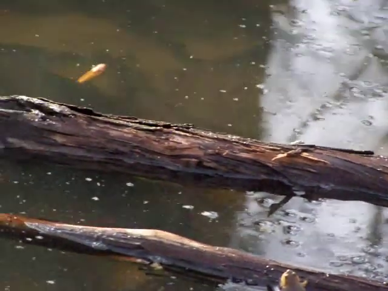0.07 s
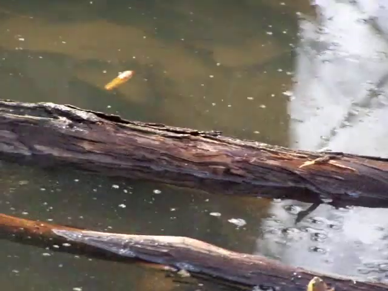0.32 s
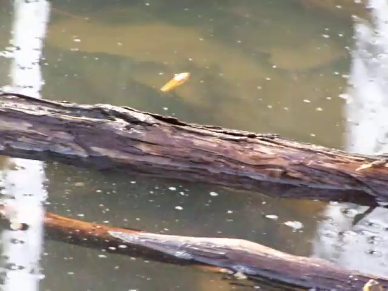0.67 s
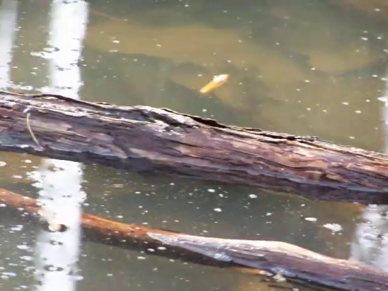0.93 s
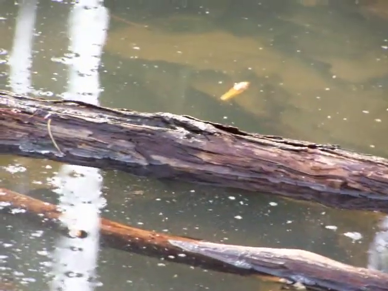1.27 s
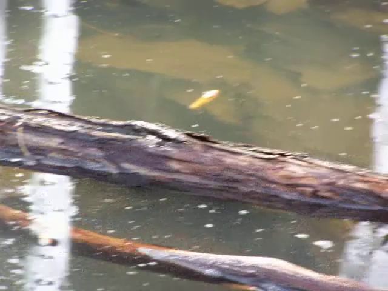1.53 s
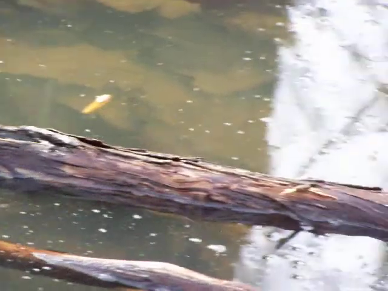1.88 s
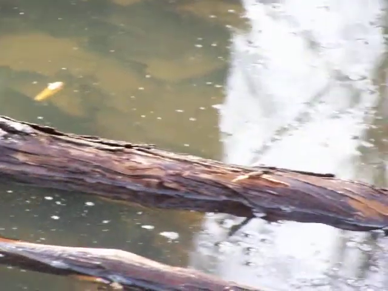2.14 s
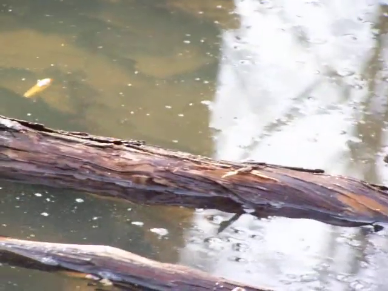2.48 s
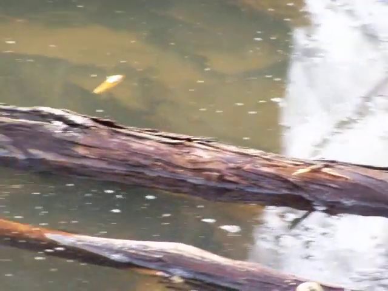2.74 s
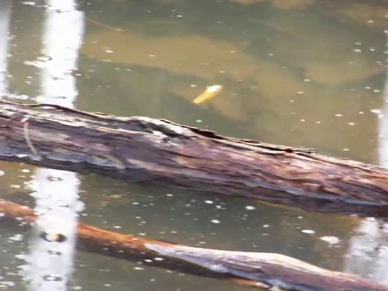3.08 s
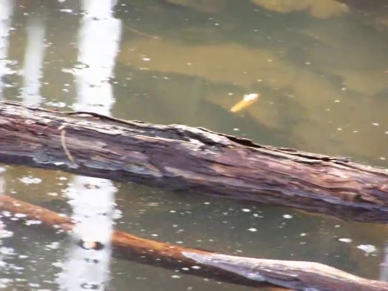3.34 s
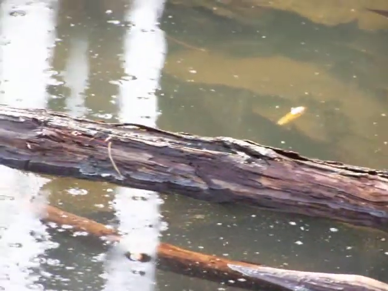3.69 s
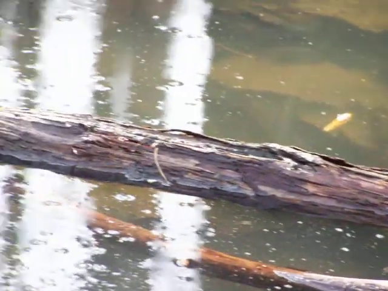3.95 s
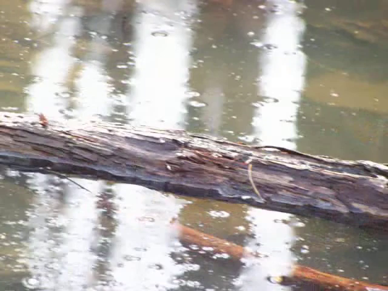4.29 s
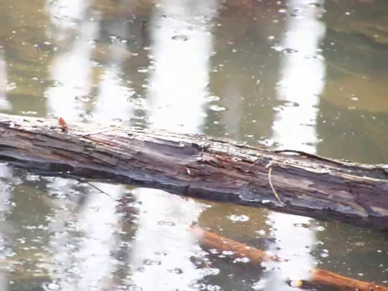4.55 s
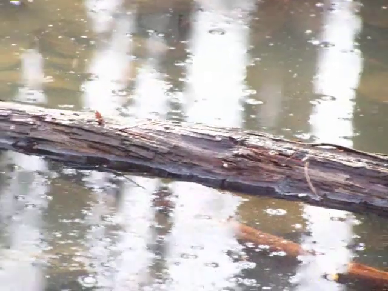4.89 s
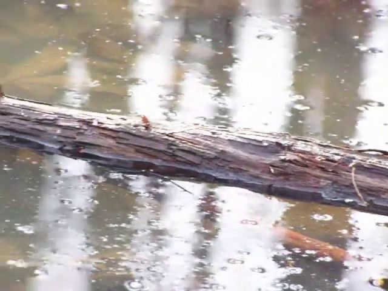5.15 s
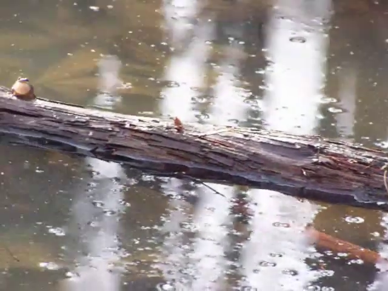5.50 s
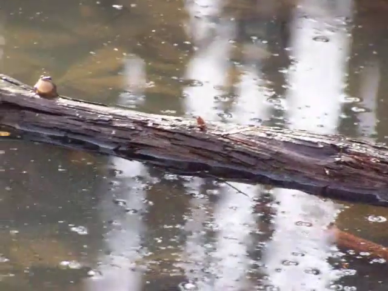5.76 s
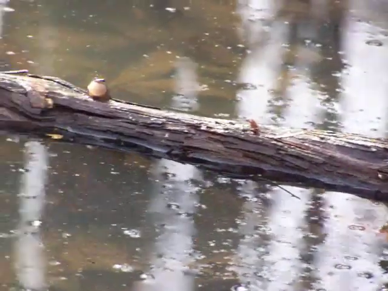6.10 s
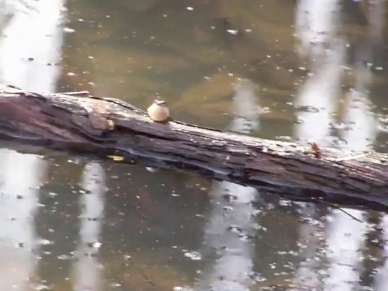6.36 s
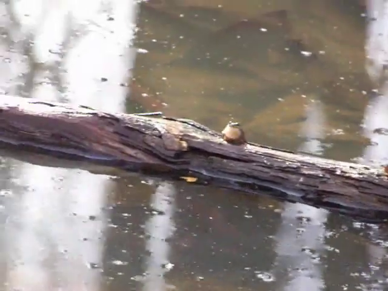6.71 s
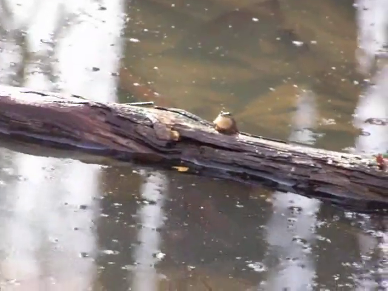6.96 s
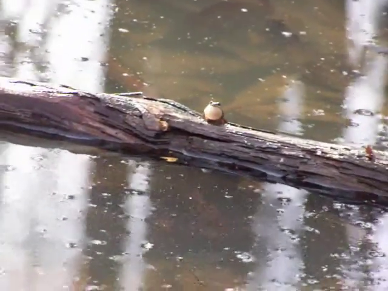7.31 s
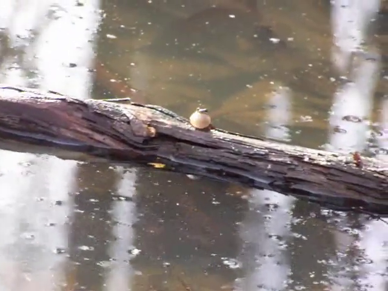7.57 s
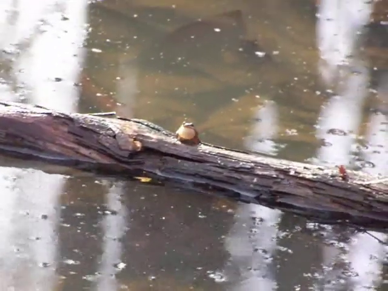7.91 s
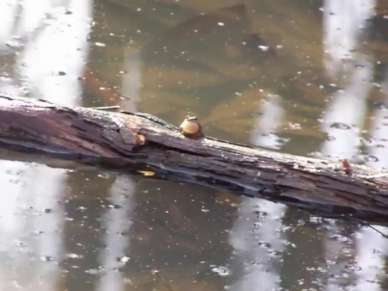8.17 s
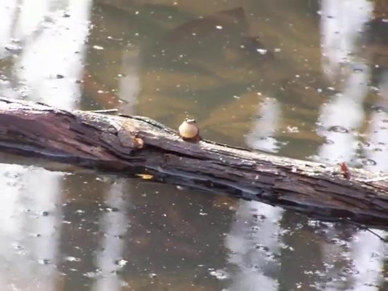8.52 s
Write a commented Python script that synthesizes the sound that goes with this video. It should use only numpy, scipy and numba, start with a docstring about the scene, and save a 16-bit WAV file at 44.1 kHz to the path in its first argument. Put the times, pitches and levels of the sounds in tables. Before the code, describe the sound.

A chorus of small frogs gives short, rising, clicky trills around a woodland pool, over a steady high din of distant frogs.

```python
"""From the start, small frogs trill round a woodland pool over a distant din and a faint rumble of air.
Each call is a comb-like run of dry clicks that slows, swells and climbs; trunks scatter the clicks.
Near 1 s the nearest frog joins, then calls about once a second; gain control ducks under it.
At 1.5 s comes one faint tick. Near calls and waves of far answers overlap to the end at 8.5 s."""
import sys
import numpy as np
from scipy import signal
from scipy.fft import rfft, irfft, next_fast_len
from scipy.io import wavfile
from scipy.ndimage import uniform_filter1d
from numba import njit

SR = 44100
rng = np.random.default_rng(int(sys.argv[2]) if len(sys.argv) > 2 else 0)


def int16_out(signal):
    """Quantize to a 16-bit WAV file."""
    q = np.round(np.clip(np.atleast_2d(signal).T, -1, 1) * 32767)
    wavfile.write(sys.argv[1], SR, q.astype(np.int16))


N = 376173

# voice: level/dB, first f/Hz, last f/Hz, swell/dB, overtones/dB, upper re lower overtone/dB, tail/dB
NEAR_VOICES = {"nearest": (3.5, 3679.5, 4077.5, 7, -17, -10, -24),
               "harsh": (-4, 3059.5, 3519.5, 3, -6.5, -11.5, -17.5),
               "steady": (1, 3128, 3289.5, 7, -13, -5, -22.5),
               "high": (-4.5, 3100, 3679.5, 9, -15.5, -12.5, -9.5),
               "middle": (-5.5, 2880.5, 3402.5, 4.5, -15.5, -8.5, -18),
               "low": (-2, 2922, 3143.5, 5.5, -17.5, -9.5, -17)}
# start t/s, end t/s, voice, last click gap/ms, effort/dB
NEAR_TRILLS = [(-.19, .206, "middle", 36, -2), (-.1, .294, "low", 32.5, -2), (.28, .775, "harsh", 35, 0),
               (.31, .772, "middle", 33, 1), (.84, 1.343, "middle", 34.5, -1),
               (.94, 1.252, "nearest", 29.8, 0), (1.0, 1.383, "high", 33, -3),
               (1.46, 1.895, "middle", 32.5, 1), (1.58, 2.1, "harsh", 38, -4),
               (1.98, 2.442, "steady", 28, -4), (2.16, 2.496, "nearest", 28.9, -1),
               (2.63, 3.083, "harsh", 36, -1), (2.64, 3.047, "high", 33, 0), (2.68, 3.12, "middle", 35, -1),
               (3.06, 3.575, "middle", 34.5, -3), (3.2, 3.574, "nearest", 29.8, .5),
               (3.6, 3.963, "steady", 28.5, 0), (3.76, 4.082, "high", 35, 0),
               (4.12, 4.53, "steady", 29, -2), (4.15, 4.561, "high", 30, -1),
               (4.15, 4.656, "harsh", 38.5, 0), (4.3, 4.816, "low", 40, -3),
               (4.64, 5.086, "middle", 32, -2), (4.75, 5.118, "nearest", 29.6, -1.5),
               (5.2, 5.596, "steady", 29, .5), (5.27, 5.69, "middle", 36, -3.5),
               (5.71, 6.197, "harsh", 39, 1), (5.77, 6.16, "low", 39, 1), (5.74, 6.17, "high", 30, -1.5),
               (6.17, 6.57, "nearest", 29.4, .5), (6.46, 6.853, "steady", 30, -1),
               (6.48, 6.842, "high", 34, -3), (6.93, 7.241, "middle", 36, 2),
               (6.92, 7.358, "low", 32.5, -.5), (7.35, 7.673, "low", 28.5, 0),
               (7.38, 7.729, "nearest", 32, 2), (7.63, 8.022, "harsh", 35.5, 1),
               (7.86, 8.3, "middle", 35, 0), (7.87, 8.292, "steady", 29.5, 0),
               (8.29, 8.659, "middle", 28, -1)]


def near_frogs():
    """Each voice has its own pitch climb, brightness and place among the trunks."""
    out = np.zeros(N)
    for voice, (db, first_hz, last_hz, swell_db, overtone_db, upper_db, tail_db) in NEAR_VOICES.items():
        track = np.zeros(N)
        for start_s, end_s, caller, last_gap_ms, effort_db in NEAR_TRILLS:
            if caller == voice:
                add_trill(track, start_s, end_s, last_gap_ms, first_hz, last_hz,
                          db + effort_db, swell_db, overtone_db, upper_db)
        out += trunks(track, tail_db)
    return out


def add_trill(track, start_s, end_s, last_gap_ms, first_hz, last_hz, db, swell_db, overtone_db, upper_db,
              first_gap_ms=18.1, slowing_clicks=8.0, sac_fill_s=.04, count=24):
    """As the frog squeezes harder, its clicks spread out, get louder and climb."""
    from_last = np.arange(count - 1)
    gaps_ms = first_gap_ms + (last_gap_ms - first_gap_ms) * np.exp(-(from_last / slowing_clicks) ** 2)
    times_s = end_s - np.r_[0, np.cumsum(gaps_ms)] / 1000
    remaining = np.clip((end_s - times_s) / (end_s - start_s), 0, 1)
    pitch_jitter, jitter_db = rng.standard_normal((count, 2)).T
    hz = (last_hz + (first_hz - last_hz) * remaining ** 1.85) * (1 + .004 * pitch_jitter)
    sac_fill = (times_s >= start_s) * (1 - .5 * np.exp(-abs(times_s - start_s) / sac_fill_s))
    gain = sac_fill * undb(db - swell_db * remaining ** 1.8 + jitter_db)
    reflection_db = -7.5 - max(db, -3)  # louder = closer = drier
    clicks = perch(larynx_clicks(hz, overtone_db, upper_db), reflection_db)
    for onset_s, click in zip(times_s, gain[:, None] * clicks):
        add(track, click, onset_s - .0014)


# click partials, sac favours the second: f/larynx pitch, base level/dB, base rise t/ms
SAC_PARTIALS = [(1, -23, 1.2), (2, 0, 1.65)]
# partials scaled by the snap: same columns
SNAP_PARTIALS = [(2.971, -1.2, 0.69), (3.921, -1.5, 0.66)]


def larynx_clicks(hz, overtone_db, upper_db, sag_ms=.93, rasp_db=-14, rasp_ms=.91):
    """The larynx snaps, the sac rings; a harder snap is brighter, shorter and sags more. One row each."""
    t_ms = np.arange(SR // 80) / SR * 1000
    jitter = rng.standard_normal((len(hz), 2))
    snap = undb(overtone_db + 1.5 * jitter[:, :1])
    stretch = np.exp(.08 * jitter[:, 1:] - .6 * snap)
    larynx_hz = hz[:, None] / 2 * (1 + .07 * snap * np.exp(-t_ms / sag_ms))
    phase = 2 * np.pi * np.cumsum(larynx_hz, axis=1) / SR
    out = snap * undb(rasp_db) * rng.standard_normal(phase.shape) * np.exp(-t_ms / rasp_ms)
    gains = (1, 1, snap, snap * undb(upper_db))
    for (multiple, db, rise_ms), gain in zip(SAC_PARTIALS + SNAP_PARTIALS, gains):
        age = t_ms / (rise_ms * stretch)
        envelope = (age * np.exp(1 - age)) ** 2
        offset_rad = rng.uniform(0, 2 * np.pi, (len(hz), 1))
        out += gain * undb(db) * envelope * np.sin(multiple * phase + offset_rad)
    return out


# throat and sac response: f/Hz, level/dB
THROAT_RESPONSE = [(600, 1), (1250, -11.5), (1750, 2), (2300, -0.5), (3000, -2.5), (4200, 1), (6500, -2),
                   (8000, -2)]


def throat(x):
    """Throats and sacs colour the calls."""
    return colour(x, THROAT_RESPONSE)


# waves of answers round the bank: t/s, level/dB
ANSWER_WAVES = [(-.2, -12.5), (0.17, -7), (.78, -6.5), (1.38, -14), (1.93, -9), (2.5, -5.5), (3.04, -4),
                (3.58, -12), (4.041, -8.5), (4.53, -7), (5.04, -9), (5.66, -7.5), (6.151, -8), (6.84, -6.5),
                (7.22, -7.5), (7.72, -11.5), (8.299, -11)]


def far_frogs(per_wave=4, max_delay_s=.14, length_s=.49, last_gap_ms=33, first_hz=2872, last_hz=3290):
    """One frog sets off its neighbours, each with its own size, pace and distance."""
    track = np.zeros(N)
    for wave_s, db in ANSWER_WAVES:
        for size, pace, distance in rng.standard_normal((per_wave, 3)):
            start_s = wave_s + rng.uniform(0, max_delay_s)
            pitch, stretch = 1 + .025 * size, 1 + .06 * pace
            add_trill(track, start_s, start_s + length_s * stretch, last_gap_ms * stretch,
                      first_hz * pitch, last_hz * pitch, db + 2 * distance,
                      swell_db=5.5, overtone_db=-13, upper_db=-9.5)
    return track


def perch(clicks, db, decay_s=.0028):
    """Quick reflections off water and logs round the frog."""
    t = np.arange(SR // 120) / SR
    scatter = rng.standard_normal(len(t)) * np.exp(-t / decay_s) * (t > .0006)
    response = (t == 0) + undb(db) * scatter / np.linalg.norm(scatter)
    return signal.fftconvolve(clicks, response[None], axes=1)


def trunks(x, tail_db, t60_s=.62):
    """Trunks scatter the sound into a thin tail."""
    t = np.arange(SR * 3 // 4) / SR
    tail = rng.standard_normal(len(t)) * undb(-60 * t / t60_s) * (t > .008)
    return x + undb(tail_db) * signal.fftconvolve(x, tail / np.linalg.norm(tail))[:N]


def tick(start_s=1.515, decay_s=.0015):
    """One faint dry tick close by."""
    track, t = np.zeros(N), np.arange(SR // 50) / SR
    add(track, undb(-23) * rng.standard_normal(len(t)) * np.exp(-t / decay_s), start_s)
    return track


# furthest frogs: f/Hz, relative density/dB
DIN_SPECTRUM = [(600, -46.5), (1200, -16.5), (1700, -26), (2300, -21), (3000, 11.5), (4000, -20),
                (5000, -35.5), (7000, -24), (11000, -71.5)]


def din():
    """The furthest frogs blur into steady noise near 3 kHz."""
    return noise(DIN_SPECTRUM, rms_db=-26)


# moving air: f/Hz, relative density/dB
AIR_SPECTRUM = [(15, -24.5), (25, -8), (96, -1), (199, -4.5), (260, -3.5), (387, -9.5), (514, -11),
                (854, -14.5), (1100, -21), (1430, -36), (2420, -120)]


def air():
    """Faint rumble of moving air."""
    return noise(AIR_SPECTRUM, rms_db=-49.5)


def undb(db):
    """Decibels to gain."""
    return 10 ** (np.asarray(db) / 20)


def add(track, sound, start_s):
    """Mix in a sound, dropping what falls outside the track."""
    i = int(start_s * SR)
    lo, hi = max(i, 0), min(i + len(sound), N)
    if hi > lo:
        track[lo:hi] += sound[lo - i:hi - i]


def colour(x, spectrum):
    """Filter by (f/Hz, level/dB) points."""
    hz, gain_db = np.transpose(spectrum)
    size = next_fast_len(N + SR // 10)
    bins_hz = np.maximum(np.fft.rfftfreq(size, 1 / SR), 1)
    gain = undb(np.interp(np.log(bins_hz), np.log(hz), gain_db))
    return irfft(rfft(x, size) * gain, size)[:N]


def noise(spectrum, rms_db):
    """Steady coloured noise."""
    x = colour(rng.standard_normal(N), spectrum)
    return x * undb(rms_db) / x.std()


@njit
def follow_peaks(x, attack, release):
    """Peak envelope; coefficients per sample."""
    out, level = np.empty(len(x)), 0.
    for i in range(len(x)):
        level += (abs(x[i]) - level) * (attack if abs(x[i]) > level else release)
        out[i] = level
    return out


def scene():
    """Near and far frogs, tick, din and air; mono."""
    frogs = near_frogs() + trunks(far_frogs(), tail_db=-11)
    return (throat(frogs) + tick() + din() + air())[None]


def record(dry, threshold_db=-9, attack_s=.00013, release_s=.13, soft_hz=7140, top_hz=8600):
    """Gain control holds down the peaks; the microphone softens and cuts the top."""
    envelope = follow_peaks(dry[0], 1 / (1 + attack_s * SR), 1 / (1 + release_s * SR))
    held = dry / np.maximum(uniform_filter1d(envelope, SR // 300) / undb(threshold_db), 1)
    soft = signal.sosfilt(signal.butter(7, soft_hz, fs=SR, output="sos"), held)
    return signal.sosfilt(signal.ellip(8, .2, 80, top_hz, fs=SR, output="sos"), soft)


dry = scene()
out = record(dry)
int16_out(out)
```